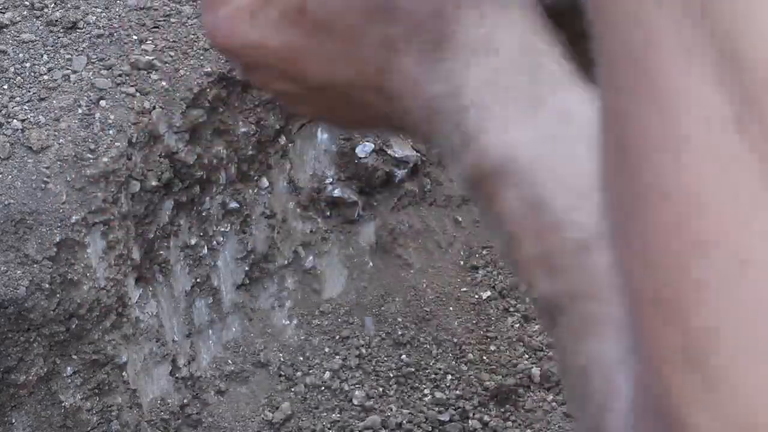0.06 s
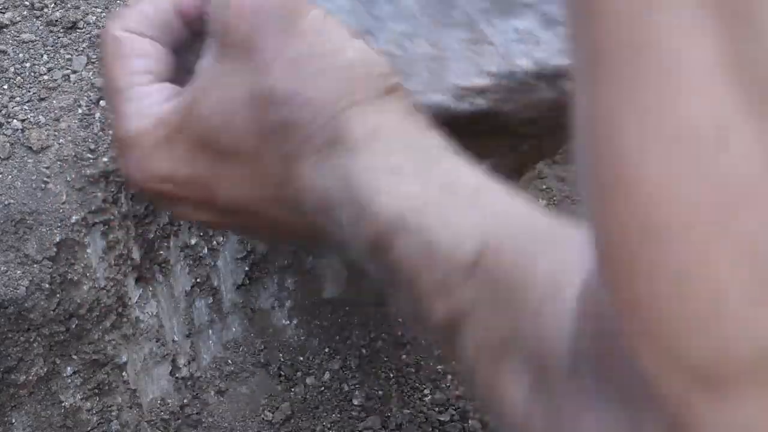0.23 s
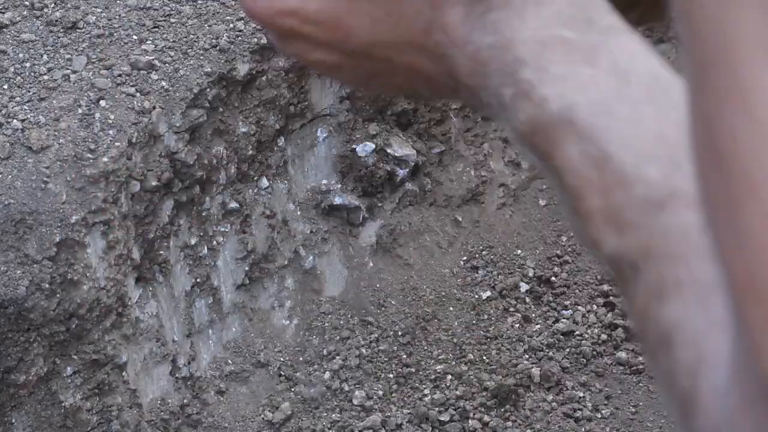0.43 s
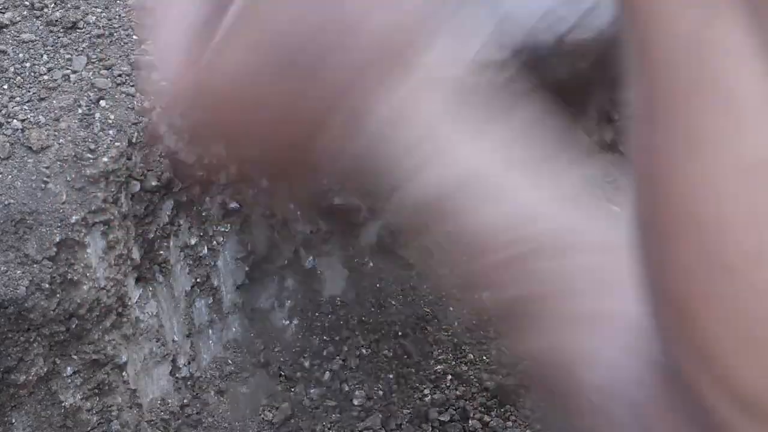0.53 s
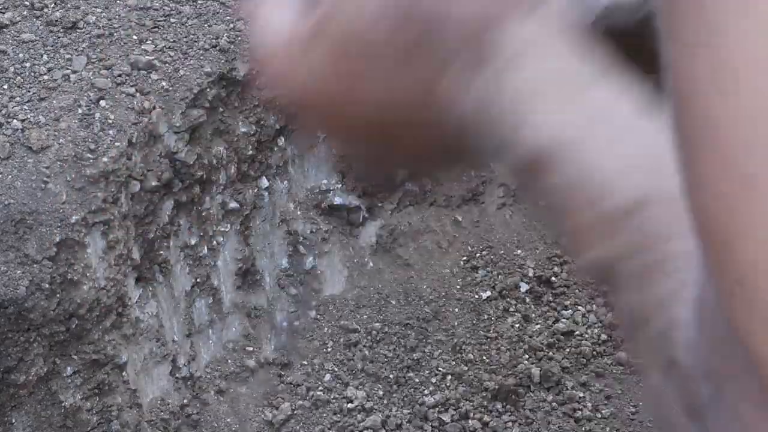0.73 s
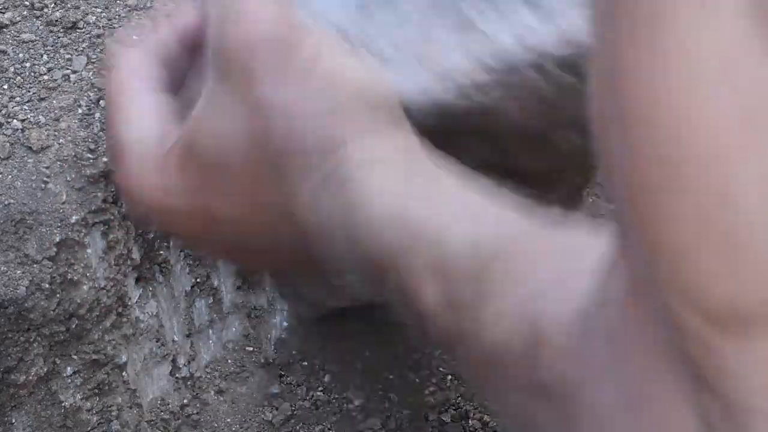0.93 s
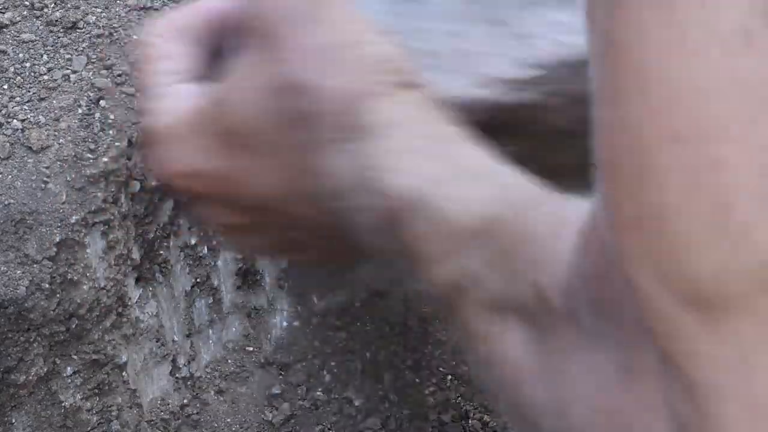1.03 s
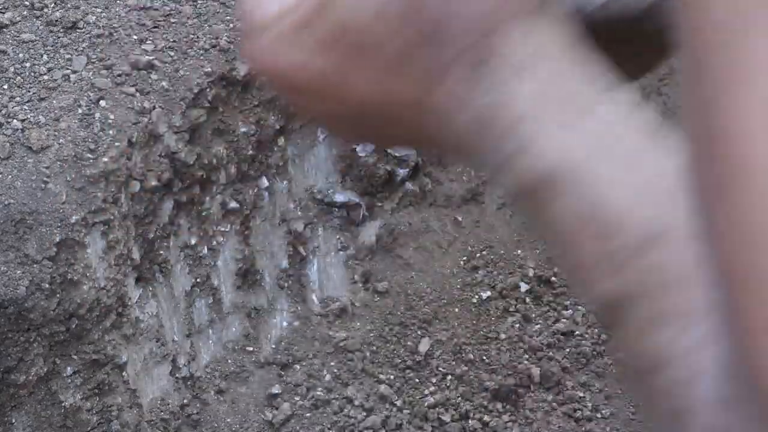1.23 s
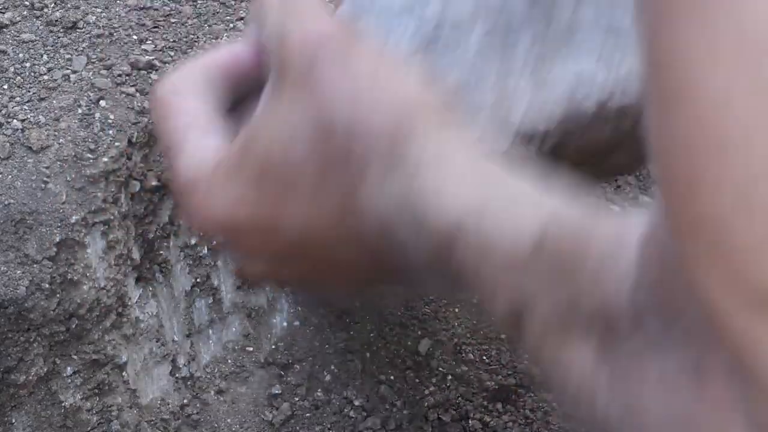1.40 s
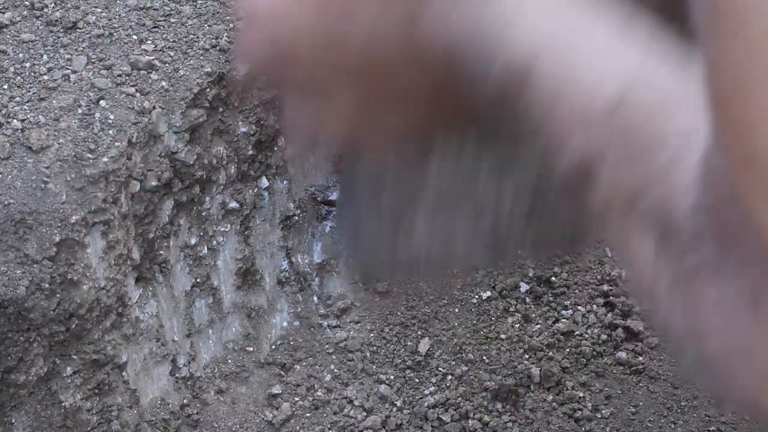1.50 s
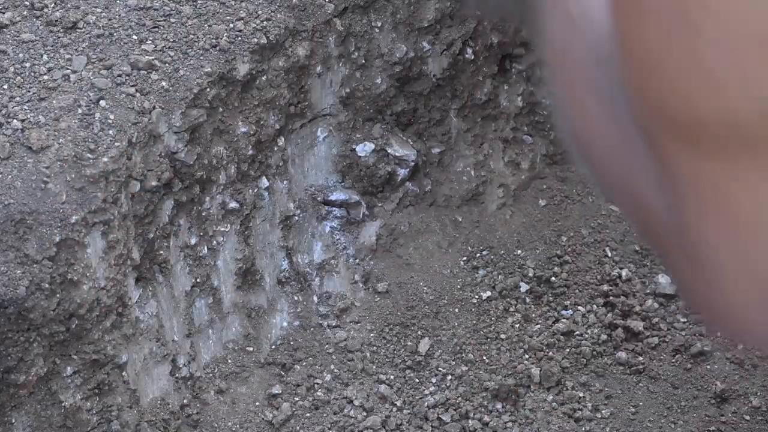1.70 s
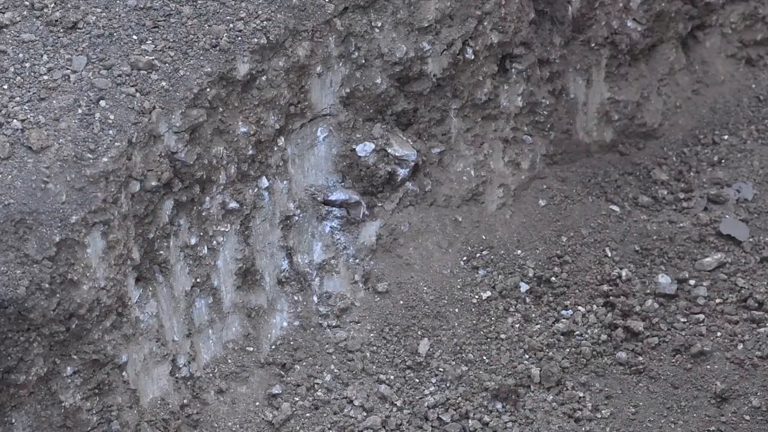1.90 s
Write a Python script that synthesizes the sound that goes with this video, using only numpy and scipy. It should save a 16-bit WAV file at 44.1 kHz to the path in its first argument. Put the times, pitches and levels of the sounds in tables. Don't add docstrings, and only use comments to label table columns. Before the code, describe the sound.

A hand-held stone pounds hard gravelly earth four times, each blow a gritty crunching thud

```python
import sys
import numpy as np
from scipy import signal
from scipy.fft import rfft, irfft
from scipy.io import wavfile
from scipy.ndimage import uniform_filter1d

SR = 44100
rng = np.random.default_rng(int(sys.argv[2]) if len(sys.argv) > 2 else 0)


def store_wav(level_fs):
    pcm = np.round(np.clip(np.atleast_2d(level_fs), -1, 1) * 32767)
    wavfile.write(sys.argv[1], SR, pcm.T.astype(np.int16))


def ratio(d):
    e = np.asarray(d, float) / 20
    return 10 ** e


N = 85995

# start in seconds, crunch level in dB, crushing time in seconds,
# crunch T60 in seconds, first crack in dB over the crunch.
STONE_BLOWS = [
    (0.1997, -29.5, 0.016, 0.081, 1.5),
    (0.596, -26, 0.029, 0.29, -11),
    (0.9684, -27.5, 0.014, 0.12, 13),
    (1.3578, -24.5, 0.011, .05, 6),
    (1.9465, -53, .01, .04, -10),
]


def unit(x):
    return x / np.sqrt(np.mean(x ** 2))


def colour(x, points):
    hz, db = np.array(points, float).T
    bin_hz = np.arange(1, 2050) * SR / 4096
    log_gain = np.interp(np.log(bin_hz), np.log(hz), db) * np.log(10) / 20
    cepstrum = irfft(log_gain)
    cepstrum[1:2048] *= 2
    cepstrum[2049:] = 0
    impulse = irfft(np.exp(rfft(cepstrum)))
    return signal.fftconvolve(x, unit(impulse)[None] / 64, axes=1)[:, :N]


def band(x, hz, width_hz):
    high = min(np.hypot(hz, width_hz / 2) + width_hz / 2, 0.45 * SR)
    low = min(hz * hz / high, high * 0.95)
    return signal.sosfilt(signal.butter(2, [low, high], "band", fs=SR, output="sos"), x)


def fade(age, t60):
    return (age >= 0) * ratio(-60 * np.clip(age, 0, None) / t60)


def grit(grains_per_s):
    scatter_db, rattle_t60_s = 2.5, 0.0032
    clicks = (rng.random((2, N)) < grains_per_s / SR) * rng.standard_normal((2, N))
    clicks = clicks * ratio(scatter_db * rng.exponential(size=(2, N)))
    age = np.arange(400) / SR
    rattle = 0.11 * rng.standard_normal(400) * fade(age, rattle_t60_s)
    rattle[0] = 1
    return unit(signal.fftconvolve(clicks, rattle[None], axes=1)[:, :N])


def air():
    # frequency in Hz, level in dB per Hz.
    air_spectrum = [(15, -32.5), (25, 6), (64, -7.5), (206, -16), (754, -22.5), (962, -25), (1100, -28),
                    (12500, -37), (16000, -38.5)]
    level_db, side_db, flicker_db = -61.5, -2, 1.5
    hold = SR // 12
    flicker = np.repeat(rng.standard_normal(N // hold + 1), hold)
    flicker = uniform_filter1d(flicker, hold)[:N]
    noise = unit(colour(rng.standard_normal((2, N)), air_spectrum))
    mid, side = noise * ratio(level_db + flicker_db * flicker)
    return mid + ratio(side_db) * side * np.array([[1], [-1]])


def debris(t):
    # start in seconds, level in dB, pitch in Hz, length in seconds.
    pebbles = [(0.2617, -53.5, 8900, 0.002), (0.283, -54.5, 9050, 0.0025), (0.3081, -47, 1570, 0.008),
               (0.3084, -59, 7400, 0.0049), (0.6728, -48, 7000, 0.0074), (0.6944, -58, 3360, 0.0088),
               (1.4495, -50.5, 1480, 0.0098), (1.7449, -50, 1820, 0.0078), (1.778, -55, 1750, .005),
               (1.8776, -50, 2230, 0.0092), (0.605, -49, 1390, 0.0076)]
    # start in seconds, length in seconds, level in dB, centre in Hz, width in Hz.
    trickles = [(0.315, 0.061, -66.5, 1730, 690), (0.523, .04, -65, 1190, 500),
                (0.648, 0.033, -55, 2160, 900), (.90, 0.034, -67.5, 775, 1160),
                (1.004, 0.026, -61, 2300, 1472), (1.051, 0.064, -61.5, 2100, 1140),
                (1.06, 0.056, -67, 8000, 8000), (1.295, 0.03, -65.5, 600, 1505),
                (1.473, 0.066, -67.5, 1800, 886), (1.478, .04, -66, 6940, 5060),
                (1.76, 0.15, -69.5, 2487, 2000), (1.859, 0.055, -64.5, 3500, 6000),
                (1.927, 0.029, -66.5, 6000, 9100), (1.398, 0.087, -67, 6950, 9000),
                (0.504, 0.084, -62, 348, 300), (1.82, 0.12, -67, 8850, 8000),
                (1.87, 0.028, -63.5, 350, 298.7), (0.25, 0.15, -68, 5800, 8100)]
    out = np.zeros((2, N))
    fine = 1.83 * grit(5600) + rng.standard_normal((2, N))
    for start, db, hz, length in pebbles:
        on = slice(int(start * SR), int((start + 0.1) * SR))
        tick = unit(band(fine[:, on], hz, 0.63 * hz))
        out[:, on] += ratio(db) * tick * fade(t[on] - start, 3 * length)
    for start, length, db, hz, width_hz in trickles:
        on = slice(int(start * SR), int((start + length) * SR))
        swell = np.sin(np.pi * (t[on] - start) / length)
        out[:, on] += ratio(db) * unit(band(fine[:, on], hz, width_hz)) * swell
    return out


def camera_body():
    # start in seconds, then sway, rocking, low knock and high knock in dB.
    shocks = [
        (-.16, -14, -13.5, -32, -40),
        (.2095, -24, -21, -26, -13),
        (.230, -15, -15, -26.5, -32.5),
        (0.607, -31.5, -30.5, -28, -22),
        (.632, -25, -15.5, -15, -22),
        (0.9748, -35.5, -26.5, -22.5, -18.5),
        (.998, -24.5, -20.5, -16.5, -27.5),
        (1.3672, -32, -19.5, -38.5, -15.5),
        (1.388, -17.5, -27, -27, -34),
    ]
    # frequency in Hz, left gain, right gain, T60 in seconds.
    body_modes = [
        [(35.15, 0.049, -.01, 1.4), (46.39, 0.76, -0.47, 0.6), (58.81, 0.72, -1.078, 0.56),
         (62.2, 0.45, -0.34, .55), (67.82, 0.28, -0.85, 0.42)],
        [(98.2, -.25, -0.083, 0.53), (120.7, 0.35, -0.11, 0.42), (170.5, -0.52, .9, 0.23)],
        [(112.63, 0.27, 0.98, 0.3), (115.6, 0.76, 0.32, .24)],
        [(144, 1, 1.33, 0.14), (164.95, 0.38, .5, 0.17), (216.3, .1, 0.26, 0.17), (185, 0.18, 0.033, 0.18)],
    ]
    rise_cycles = [0.76, 0.63, 0.49, .4]
    lead = SR // 4
    age = np.arange(N + lead) / SR
    out = np.zeros((2, N + lead))
    for k, group in enumerate(body_modes):
        ring = 0
        for hz, left, right, t60 in group:
            swing_up = 1 - np.exp(-age * hz / rise_cycles[k])
            mode = swing_up * fade(age, t60) * np.sin(2 * np.pi * hz * age)
            ring = ring + np.array([[left], [right]]) * mode
        for s, *levels_db in shocks:
            start = int(s * SR) + lead
            out[:, start:] += ratio(levels_db[k]) * ring[:, :N + lead - start]
    return out[:, lead:]


def pit_hollow(t):
    starts = np.array(STONE_BLOWS)[:-1, :1]
    swell = ratio(-41.5) * fade(t - starts, 0.25).sum(axis=0)
    noise = unit(band(rng.standard_normal((2, N)), 330, 250))
    return noise * swell * np.array([[1], [3.0]])


def earth_thuds(t):
    # start in seconds, level in dB, pitch in Hz, T60 in seconds.
    thuds = [(0.2024, -23, 330, 0.042), (.206, -26, 475, .03), (.598, -20, 330, 0.024),
             (0.614, -23, 423, 0.02), (.606, -24, 300, .04), (.622, -32, 560, .04),
             (0.9693, -14, 290, 0.037), (.971, -19, 732, 0.027), (1.3581, -22.5, 325, 0.075),
             (1.364, -15.5, 294.5, 0.032), (1.359, -24, 695, 0.045), (1.9470, -45.5, 200, 0.046)]
    thud = 0
    for start, db, hz, t60 in thuds:
        age = t - start
        thud = thud + ratio(db) * fade(age, t60) * np.sin(2 * np.pi * hz * age)
    return -thud * np.array([[1], [0.8]])


def crushed_grit(t):
    # frequency in Hz, level in dB per Hz.
    crunch_spectrum = [(240, -30.5), (400, -2), (949, -10.5), (2360, -14.5), (3750, -18.5), (4650, -23.5),
                       (6850, -20), (11600, -26), (16000, -46.5)]
    grain_edges_hz = [700, 1200, 2200, 3800, 6000, 9000, 12500, 17000]
    bite_s, crack_s, stop_t60_s = 0.0009, 0.0027, 0.02
    dust_db, dust_t60_s = -31.5, 0.39
    dust_tilt_db, grain_tilt_db = -1.5, 0.66
    start, db, hold, t60, crack_db = np.array(STONE_BLOWS).T[:, :, None]
    age = t - start
    bite = ratio(db) * np.clip(age / bite_s, 0, 1) ** 2
    crack = ratio(crack_db) * fade(np.maximum(age - crack_s, 0), stop_t60_s)
    crushing = fade(age, t60) * fade(np.maximum(age - hold, 0), stop_t60_s)
    crush = (bite * (crushing + crack)).sum(axis=0)
    dust = (bite * ratio(dust_db) * fade(age, dust_t60_s)).sum(axis=0)
    crunch = 0
    for low, high in zip(grain_edges_hz[:-1], grain_edges_hz[1:]):
        octave = np.log2(low / 2000)
        grains = grit(5000 * np.sqrt(low / 2000)) * crush
        grains = grains + rng.standard_normal((2, N)) * dust * ratio(dust_tilt_db * octave)
        crunch = crunch + ratio(grain_tilt_db * octave) * band(grains, np.sqrt(low * high), high - low)
    return colour(crunch, crunch_spectrum)


def scene():
    twist_rad, twist_hz = 1.15, 7800
    pan_db, spread_db = -1.17, -16
    t = np.arange(N) / SR
    mid, side = crushed_grit(t) + earth_thuds(t) + pit_hollow(t) + debris(t)
    side = ratio(spread_db) * side
    hz = np.arange(N // 2 + 1) * SR / N
    phase = twist_rad / (1 + (twist_hz / (hz + 1)) ** 8)
    late = irfft(rfft(mid) * np.exp(-1j * phase), N)
    left = (mid + side) * ratio(pan_db / 2)
    right = (late - side) * ratio(-pan_db / 2)
    return np.array([left, right]) + camera_body() + air()


def roll_off(x):
    return signal.sosfilt(signal.butter(12, 16720, fs=SR, output="sos"), x)


def record(dry):
    top_cut = signal.ellip(8, 0.5, 70, 16350, fs=SR, output="sos")
    mix = signal.sosfilt(top_cut, dry)
    return roll_off(mix)


dry = scene()
out = record(dry)
store_wav(out)
```